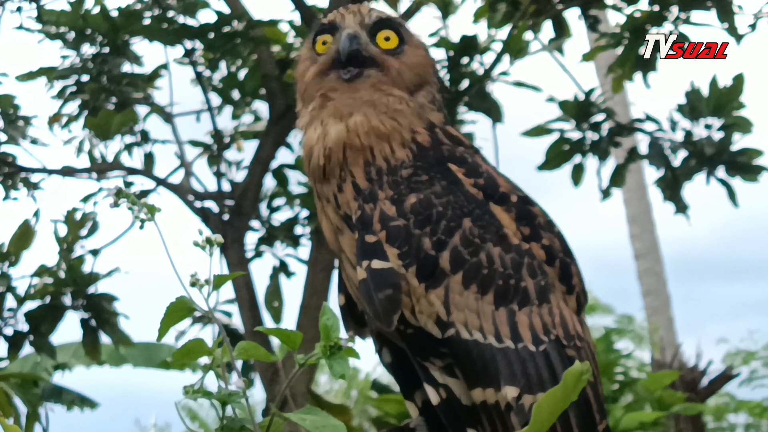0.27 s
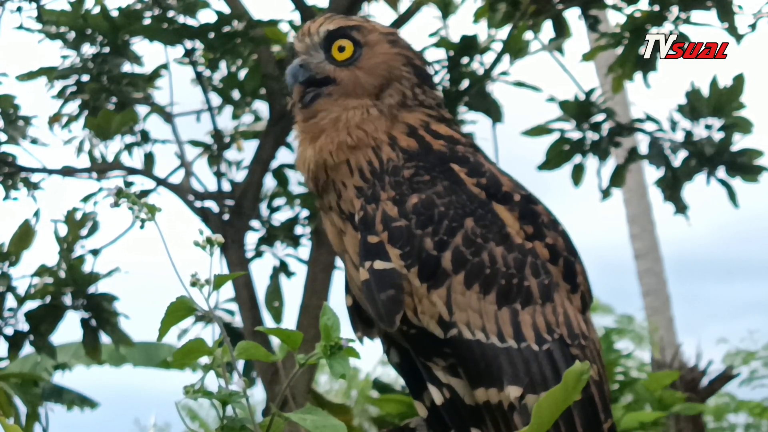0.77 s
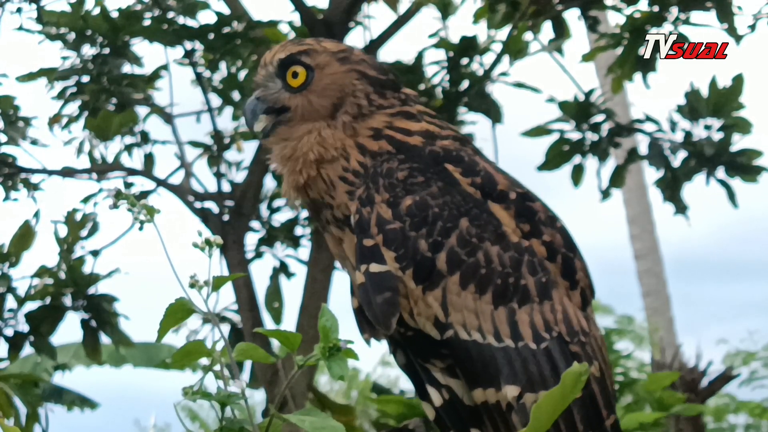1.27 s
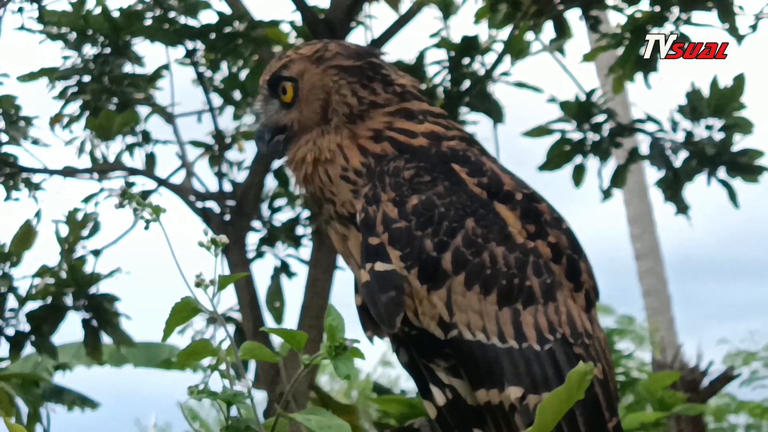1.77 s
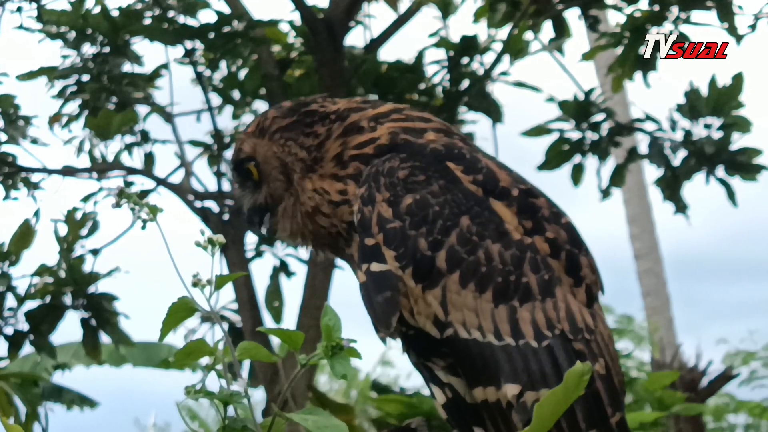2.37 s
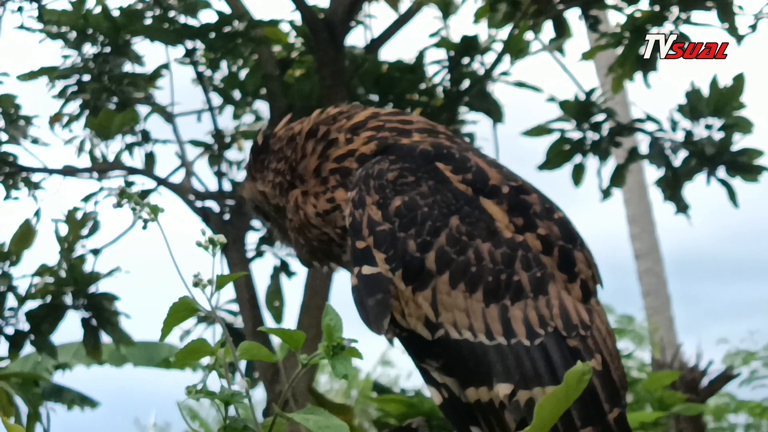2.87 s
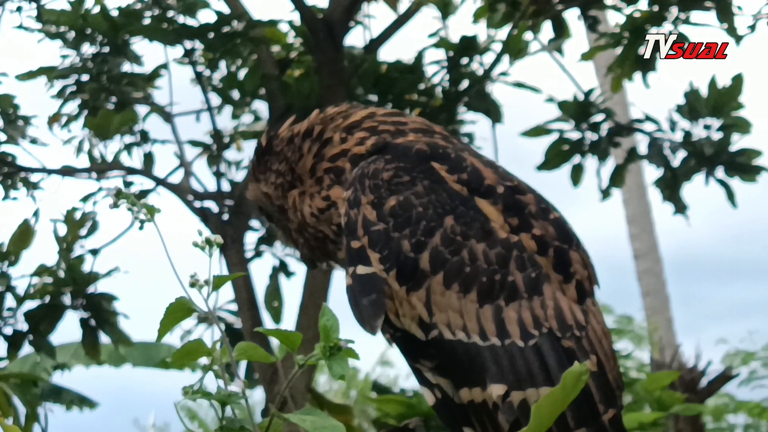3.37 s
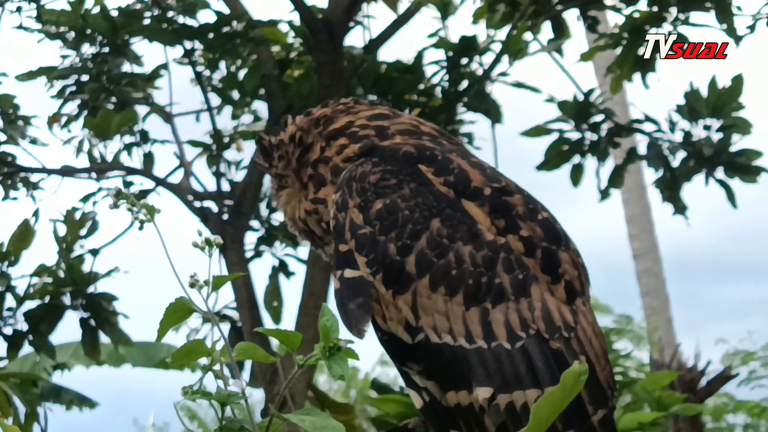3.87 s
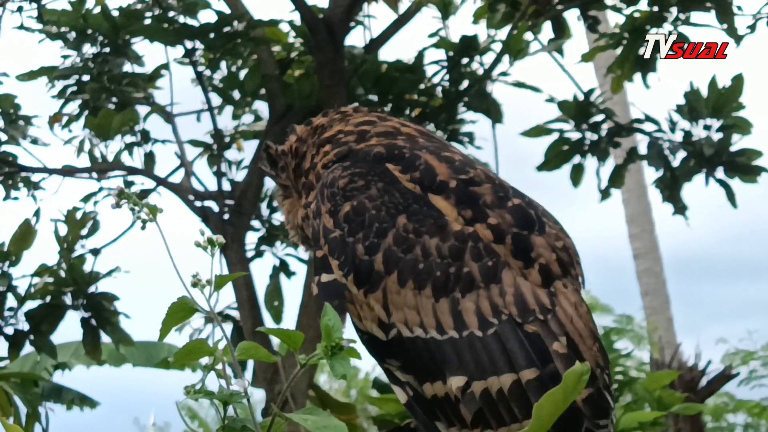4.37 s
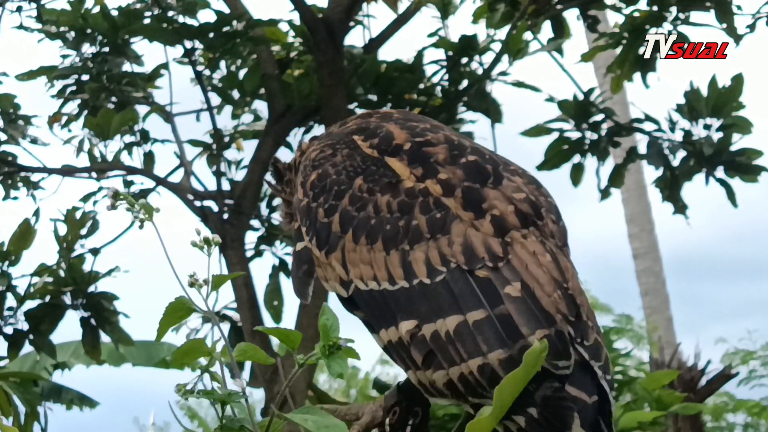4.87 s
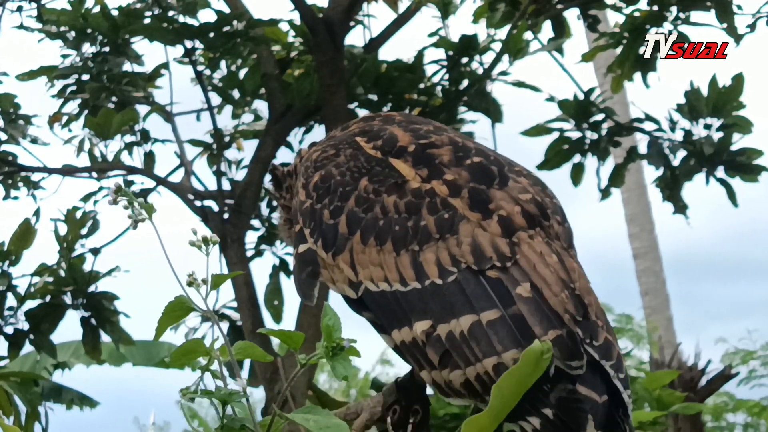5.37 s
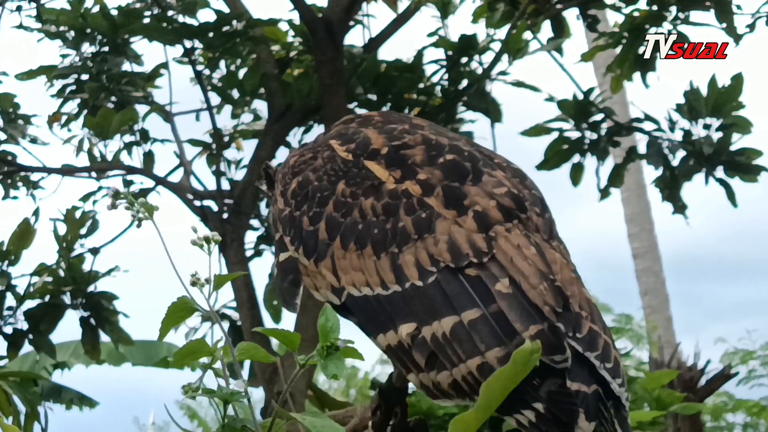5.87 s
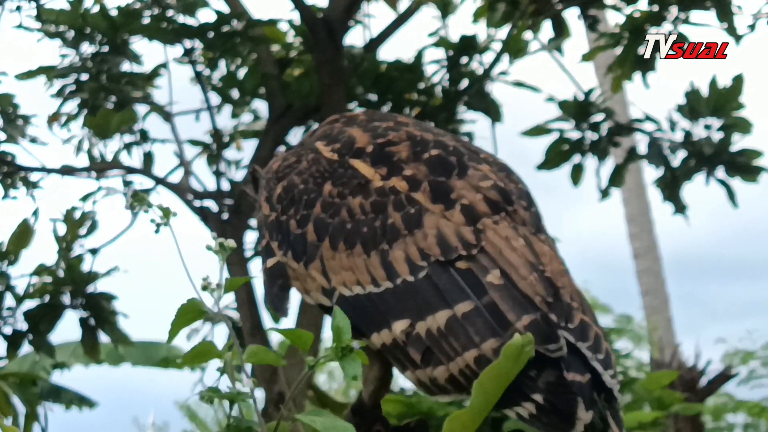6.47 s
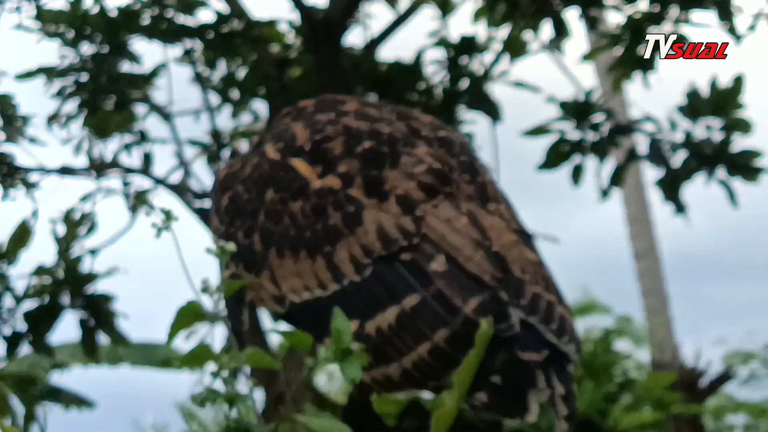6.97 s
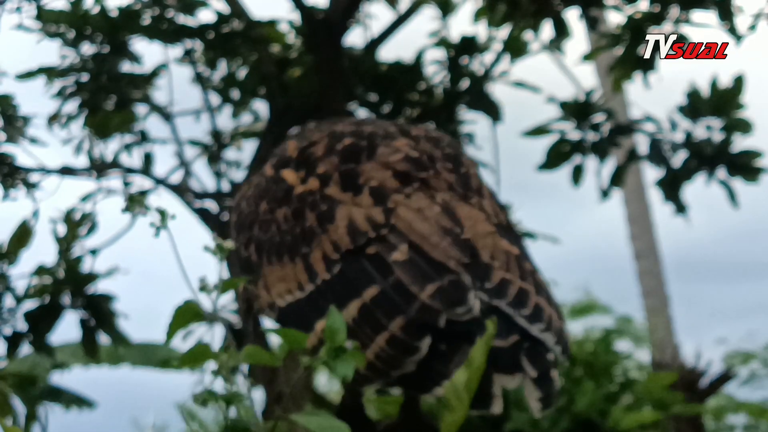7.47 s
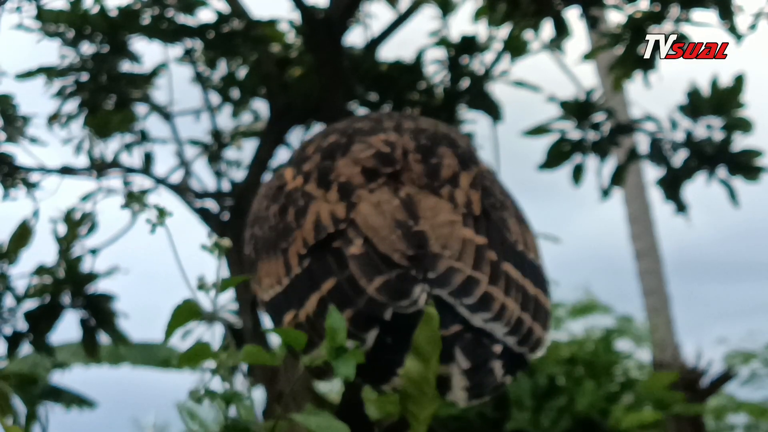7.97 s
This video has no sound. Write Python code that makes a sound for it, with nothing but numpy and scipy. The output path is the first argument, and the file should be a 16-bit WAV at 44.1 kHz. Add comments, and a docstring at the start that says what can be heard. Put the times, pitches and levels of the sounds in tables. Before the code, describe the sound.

Cicadas buzz steadily among tropical trees while an owl hoots in brief pairs, with faint birdsong and soft microphone bumps.

```python
"""Cicadas buzz near 6 kHz over a dry hiss among tropical trees; small birds chip, whistle and warble.
Then an owl, the main sound, gives two pairs of short, pure hoots that rise and fall in pitch.
The hiss drops away as each pair begins. Each cicada buzzes by clicking its tymbals (small drum skins)
very fast, which makes its body ring. Trunks and leaves scatter the bird calls into a soft echo.
A hand-held mono microphone adds rumble and soft bumps, and a few twigs tick."""
import sys
import numpy as np
from scipy import signal
from scipy.fft import rfft, irfft
from scipy.io import wavfile
from scipy.ndimage import uniform_filter1d

SR = 44100
rng = np.random.default_rng(int(sys.argv[2]) if len(sys.argv) > 2 else 0)


def output_pcm(signal):
    """Save a mono or channel-first signal as 16-bit PCM at the path in sys.argv[1].

    Samples are clipped to [-1, 1] before scaling.
    """
    pcm = np.clip(np.atleast_2d(signal).T, -1, 1) * 32767
    wavfile.write(sys.argv[1], SR, np.round(pcm).astype(np.int16))


N = 362061
TIME = np.arange(N) / SR

# the dull tone of a hand rubbing the microphone: frequency_hz, relative_db
RUB_SPECTRUM = [(20, -22), (50, -11), (90, 4.5), (150, 0), (240, -1), (400, -7.5), (800, -57)]


def from_db(db):
    """Turn decibels into a factor to multiply by."""
    return 10 ** (np.asarray(db) / 20)


def rms_one(x):
    """Scale a signal so that its average strength (rms) is 1."""
    return x / np.sqrt(np.mean(x ** 2) + 1e-20)


def ramp(elapsed_s, length_s):
    """Rise from 0 to 1 over the given length."""
    return np.clip(elapsed_s / length_s, 0, 1)


def gain_at_hz(spectrum, hz):
    """Read the gain at a frequency from rows of frequency_hz, level_db."""
    known_hz, db = np.transpose(spectrum)
    return from_db(np.interp(np.log(np.maximum(hz, 1)), np.log(known_hz), db))


def gain_curve(rows):
    """Gain over time from the last column (dB); silent outside the rows."""
    rows = np.array(rows)
    inside = (TIME >= rows[0, 0]) & (TIME <= rows[-1, 0])
    return from_db(np.interp(TIME, rows[:, 0], rows[:, -1])) * inside


def pitch_curve(rows, column=1):
    """Frequency over time from one column, usually the second."""
    rows = np.array(rows)
    return np.interp(TIME, rows[:, 0], rows[:, column])


def phase_of(hz):
    """The running angle of a wave whose pitch may change."""
    return 2 * np.pi * np.cumsum(hz) / SR


def noise(spectrum):
    """Noise with the given level per Hz."""
    hz = np.arange(N // 2 + 1) * SR / N
    return irfft(rfft(rng.standard_normal(N)) * gain_at_hz(spectrum, hz), N) * np.sqrt(SR / 2)


def drift(rate_hz):
    """Random wavering up to about the given rate, with a typical size of 1."""
    hz = np.arange(N // 2 + 1) * SR / N
    return rms_one(irfft(rfft(rng.standard_normal(N)) / (1 + (hz / rate_hz) ** 2), N))


def resonance(centre_hz, half_width_hz):
    """Noise ringing in a band whose centre may move."""
    low_pass = signal.butter(2, half_width_hz, fs=SR, output="sos")
    slow_noise = signal.sosfilt(low_pass, rng.standard_normal(N) + 1j * rng.standard_normal(N))
    return rms_one(np.real(slow_noise * np.exp(1j * phase_of(centre_hz * np.ones(N)))))


def add(track, start_s, sound):
    """Mix a short sound into a track."""
    at = max(int(start_s * SR), 0)
    track[at:at + len(sound)] += sound[:max(N - at, 0)]


def tree_echo(sound, first_echo_s=0.0065, fade_60_db_s=0.98):
    """Trunks and leaves scatter a sound into a thin tail that builds up and dies away."""
    t = np.arange(SR) / SR
    build_up = ramp(t - first_echo_s, first_echo_s)
    echoes = rng.standard_normal(SR) * from_db(-60 * t / fade_60_db_s) * build_up
    return signal.fftconvolve(sound, echoes / np.sqrt(np.sum(echoes ** 2)))[:N]


def open_air():
    """Air, far leaves and water blend into a faint, steady wash."""
    # the tone of the wash: frequency_hz, level_db (per Hz)
    spectrum = [(20, -95), (60, -78.5), (170, -88.5), (270, -71), (700, -68), (1600, -68.5), (2600, -69.5),
                (3300, -71), (4200, -77), (7500, -76.5), (10950, -76.5), (11250, -100), (12900, -99),
                (13500, -120)]
    return noise(spectrum)


def dry_hiss(grain_db=1.5, break_s=.06):
    """A slightly grainy hiss changes slowly in level and drops suddenly between stretches."""
    # the tone of the hiss: frequency_hz, relative_db
    spectrum = [(1700, -34), (2050, -6), (2400, -0.5), (2800, -7.5), (3200, -13.5), (3650, 3), (3950, -2.5),
                (4300, -6), (4900, -1), (7000, -2.5), (8700, -3.5), (9600, -6.5), (10950, -20),
                (11400, -23), (13000, -36), (13600, -71)]
    # where the stretches begin and end: time_s
    edges = [0, 2.81, 5.56, 7.3, 8.21]
    # one row for each stretch: first_db, last_db
    stretches = [(-28.6, -27.7), (-38, -30), (-37, -33.5), (-47, -51)]
    level_db = np.zeros(N)
    for start, end, (first_db, last_db) in zip(edges, edges[1:], stretches):
        level_db = np.where(TIME >= start, np.interp(TIME, [start, end], [first_db, last_db]), level_db)
    swells = from_db(uniform_filter1d(level_db, int(break_s * SR)))
    return rms_one(noise(spectrum) * from_db(grain_db * drift(400))) * swells


def grip_rumble(lumpy_db=2.6, boost_db=1.5, wander_db=2.5):
    """The hand holding the microphone makes a low, lumpy rumble."""
    # the strength of the rumble: time_s, relative_db
    levels = [(0.0, -44), (3.0, -57.5), (3.7, -50), (5.26, -54), (6.56, -49.5), (6.84, -53.5), (7.32, -47),
              (7.7, -56), (8.21, -50)]
    rub = rms_one(noise(RUB_SPECTRUM) * from_db(lumpy_db * drift(27)))
    return rub * gain_curve(levels) * from_db(boost_db + wander_db * drift(6))


def grip_bumps(lumpy_db=2.6, bass_cut_hz=105):
    """Each shift of the hand makes a soft bump with less bass than the rumble."""
    # shifts of the grip: middle_s, length_s, level_db
    shifts = [(.25, 0.39, -44.5), (1.213, 0.11, -40.5), (1.65, .05, -47), (3.105, .08, -30.5),
              (3.74, 0.19, -38.5), (4.18, .05, -44), (5.052, .12, -48), (5.736, .07, -38), (5.92, .08, -40),
              (6.224, 0.067, -29), (6.62, 0.29, -39.5), (6.967, 0.048, -37), (7.341, 0.53, -39)]
    bass_cut = signal.butter(2, bass_cut_hz, "high", fs=SR, output="sos")
    rub = signal.sosfilt(bass_cut, noise(RUB_SPECTRUM))
    swells = sum(from_db(db) * np.sin(np.pi * ramp(TIME - middle + length / 2, length))
                 for middle, length, db in shifts)
    return rms_one(rub * from_db(lumpy_db * drift(27))) * swells


def housing_knocks():
    """A knock on the microphone's housing is one dull, bell-shaped pulse."""
    # the knocks: time_s, peak_db, width_s
    knocks = [(3.382, -14, 0.00026), (7.085, -20, 0.00033)]
    return sum(from_db(db) * np.exp(-np.minimum(((TIME - time_s) / width) ** 2 / 2, 20))
               for time_s, db, width in knocks)


def twig_ticks(decay_s=.003):
    """Twigs and leaves give short, dry cracks of noise, each an octave wide."""
    # the cracks: start_s, centre_hz, level_db
    cracks = [(.35, 800, -19), (1.3673, 7000, -33), (1.8816, 7050, -22), (2.6564, 6960, -20),
              (3.1552, 6000, -20), (4.3595, 3080, -26), (4.541, 2420, -22.5), (6.3091, 7960, -24),
              (6.8472, 7020, -22)]
    out, t = np.zeros(N), np.arange(SR // 20) / SR
    for start, hz, db in cracks:
        band = signal.butter(4, [hz / np.sqrt(2), hz * np.sqrt(2)], "band", fs=SR, output="sos")
        burst = rms_one(signal.sosfilt(band, rng.standard_normal(len(t))))
        add(out, start, from_db(db) * np.exp(-t / decay_s) * burst)
    return out


def thin_buzz(fade_s=0.028, pulse_hz=88, depth=.8):
    """An insect gives faint, very high, pulsing bursts."""
    # the bursts: start_s, end_s, level_db
    bursts = [(5.201, 5.55, -74), (5.829, 6.561, -54), (6.828, 7.526, -54), (7.802, 8.3, -53)]
    # the bands it rings in: centre_hz, half_width_hz, relative_db
    bands = [(12130, 330, 0.45), (13400, 200, -2.5)]
    gain = sum(from_db(db) * ramp(np.minimum(TIME - start, end - TIME), fade_s)
               for start, end, db in bursts)
    pulses = 1 + depth * np.cos(2 * np.pi * pulse_hz * TIME)
    ringing = sum(from_db(db) * resonance(hz, half_width) for hz, half_width, db in bands)
    return gain * rms_one(pulses * ringing)


def throb(clicks_per_s, depth):
    """A gain that swells once for each tymbal click."""
    return rms_one(1 + depth * np.cos(phase_of(clicks_per_s * np.ones(N))))


def far_cicadas(half_width_hz=260, spread_hz=200, gain_db=-3.5):
    """Many far cicadas merge into one band of noise whose centre wanders."""
    # the course of the chorus: time_s, centre_hz, relative_db
    chorus = [(0.0, 6320, -33), (0.2, 6260, -27), (1.44, 6550, -26), (2.88, 6030, -31), (3.45, 6060, -33),
              (4.05, 6200, -26.5), (5.9, 6510, -28), (6.47, 6280, -29.5), (7.27, 6140, -34.5),
              (8.21, 6250, -35)]
    centre = pitch_curve(chorus)
    swarm = resonance(centre - spread_hz, half_width_hz) + resonance(centre + spread_hz, half_width_hz)
    return rms_one(swarm) * throb(clicks_per_s=244, depth=.3) * gain_curve(chorus) * from_db(gain_db)


def tymbal_buzz(rate, gain, body, jitter=0.001182, flutter_db=1.5):
    """Regular clicks make tones at multiples of their rate; those near the body's ring sound loudest."""
    phase = phase_of(rate * (1 + jitter * drift(39.63)))
    lowest, highest = int(body[0][0] / rate.max()) + 1, int(body[-1][0] / rate.min())
    tones = sum(gain_at_hz(body, k * rate) * np.sin(k * phase + 2 * np.pi * rng.random())
                for k in range(lowest, highest + 1))
    return np.sqrt(2) * tones * gain * from_db(flutter_db * drift(6))


def hoarse_cicada(tones_db=-4.5):
    """Each click is a noisy burst in the body's ringing bands, which rise as the belly tightens."""
    # two spells of song, each with rows of: time_s, clicks_per_s, ring_hz, level_db
    spells = [
        [(1.8, 290, 6060, -53), (2.4, 274, 6000, -31), (2.8, 275, 6000, -28.5), (3.45, 264, 6030, -30.5),
         (3.9, 243, 6360, -33.5), (4.4, 262, 6580, -36.5), (5.0, 258, 6480, -36.5)],
        [(5.6, 230, 6280, -36.5), (6.2, 205, 6120, -38.5), (6.5, 260, 6085, -33.5), (7.3, 290, 6094, -30),
         (7.75, 300, 6060, -31), (8.21, 220, 6000, -35)],
    ]
    # the body's ringing bands: ratio_to_ring_hz, half_width_hz, relative_db
    bands = [(1, 115, 0), (1.04, 90, -7), (.925, 130, -7), (.848, 115, -6.5), (.79, 130, -11)]
    # the strength of the tones from its more regular clicks: frequency_hz, relative_db
    tone_spectrum = [(4950, -14), (5100, -6), (5350, -14), (5600, -8), (5750, -8), (5900, 0), (6080, 0),
                     (6300, -4), (6450, -20)]
    song = np.concatenate(spells)
    rate, ring_hz, gain = pitch_curve(song), pitch_curve(song, column=2), gain_curve(song)
    body = sum(from_db(db) * resonance(ratio * ring_hz, half_width) for ratio, half_width, db in bands)
    rasp = rms_one(body) * throb(rate, depth=0.54) * gain
    return rasp + from_db(tones_db) * tymbal_buzz(rate, gain, tone_spectrum, jitter=0.00405)


def warm_up(song, fade_s=0.47):
    """Click rate and gain rise with a cicada's effort; each spell of song fades at its end."""
    rate, gain = np.full(N, float(song[0][3])), np.zeros(N)
    for start, end, warm_up_s, first_rate, settled_rate in song:
        effort = 1 - np.exp(-np.maximum(TIME - start, 0) / warm_up_s)
        rate = np.where(TIME >= start, first_rate + (settled_rate - first_rate) * effort, rate)
        gain += effort * ramp(end - TIME, fade_s)
    return rate, gain


def near_cicadas():
    """Three near cicadas buzz clearly, each with its own click rate and ringing body."""
    # spells of song: start_s, end_s, warm_up_s, first_clicks_per_s, settled_clicks_per_s
    slow_song = [(-6, .72, 1.42, 226, 248), (3.5, 9, 1.42, 226, 248)]
    fast_song = [(-.05, 2.9, .45, 260.5, 266.8)]
    medium_song = [(-.05, 2.6, .28, 250, 261.8)]
    # how strongly each body rings: frequency_hz, relative_db
    slow_body = [(5700, -22), (6150, -7), (6400, 0), (6570, 3), (6660, -10), (6830, -5), (6910, -2),
                 (7150, -4), (7280, -20)]
    fast_body = [(5600, -30), (6130, -6.5), (6400, -11), (6665, 2), (6930, -13), (7300, -2)]
    medium_body = [(5600, -6), (6000, -7.5), (6250, 3), (6540, -10), (6800, -8), (7070, -16), (7300, -30)]
    singers = [(slow_song, slow_body, -36), (fast_song, fast_body, -36), (medium_song, medium_body, -37)]
    return sum(from_db(db) * tymbal_buzz(*warm_up(song), body) for song, body, db in singers)


def glide(length_s, from_hz, to_hz):
    """A sliding whistled note with soft ends."""
    progress = np.linspace(0, 1, int(length_s * SR))
    envelope = np.sqrt(4 * progress * (1 - progress))
    return np.sqrt(2) * envelope * np.sin(phase_of(from_hz + (to_hz - from_hz) * progress))


def whistling_bird(trees_db=-15):
    """A far bird repeats a slightly sinking whistle."""
    # the whistles: start_s, level_db
    whistles = [(5.598, -36.5), (6.585, -36.5), (7.572, -37.5)]
    voice = np.zeros(N)
    for start, db in whistles:
        add(voice, start, from_db(db) * glide(length_s=.2, from_hz=2980, to_hz=2912))
    return voice + from_db(trees_db) * tree_echo(voice)


def warbling_bird(start_s=6.157, every_s=.1605, repeats=8, trees_db=-3):
    """A bird deep in the trees gives stray notes and a repeated zigzag that swells and fades."""
    # one zigzag, a short rise and then an arch: time_s (from its start), pitch_hz, relative_db
    shape = [(0, 2150, -7), (.018, 2370, 0), (.042, 2620, -8), (.066, 2450, -28), (.092, 2250, -9),
             (.116, 2620, -1), (.134, 2820, -2), (.151, 2400, -2), (.1605, 2150, -7)]
    # single notes: start_s, length_s, from_hz, to_hz, level_db
    stray_notes = [(.77, .05, 2400, 2740, -34.5), (.988, .034, 2650, 2310, -33.5),
                   (1.079, .035, 2300, 2530, -35), (1.581, .083, 2410, 2620, -38),
                   (8.0, .04, 2800, 2450, -38)]
    peak_s, peak_db, fade_db_per_s = 6.42, -34, 9
    zigzag = np.sqrt(2) * gain_curve(shape) * np.sin(phase_of(pitch_curve(shape)))
    voice = np.zeros(N)
    for k in range(repeats):
        add(voice, start_s + k * every_s, zigzag)
    voice *= from_db(peak_db - fade_db_per_s * np.abs(TIME - peak_s))
    for start, length, from_hz, to_hz, db in stray_notes:
        add(voice, start, from_db(db) * glide(length, from_hz, to_hz))
    return voice + from_db(trees_db) * tree_echo(voice)


def chipping_bird(top_hz=7770, droop_hz=900, length_s=0.017, echo_s=0.016, echo_db=-12, trees_db=-11):
    """A small bird gives pairs of tiny, high, arched chips, each with one near echo."""
    # the chips: middle_s, level_db
    chips = [(1.3824, -16.5), (1.528, -18), (4.027, -22.5), (4.1678, -22.5), (7.0979, -21.5), (7.2533, -29)]
    from_middle = np.linspace(-1, 1, int(length_s * SR))
    envelope = np.cos(from_middle * np.pi / 2) ** 2
    chip = np.sqrt(2) * envelope * np.sin(phase_of(top_hz - droop_hz * from_middle ** 2))
    out = np.zeros(N)
    for middle, db in chips:
        start = middle - length_s / 2
        add(out, start, from_db(db) * chip)
        add(out, start + echo_s, from_db(db + echo_db) * chip)
    return out + from_db(trees_db) * tree_echo(out)


def owl(waver=.0005, attack_s=.02, release_s=.052, trunk_echo_s=.055, trunk_db=-18.5, trees_db=-14.5):
    """Each hoot is one pure tone on an arch of pitch; near echoes hollow it out around the top."""
    # the hoots: start_s, length_s, top_pitch_hz, level_db
    hoots = [(2.8082, .1345, 1503, -18.9), (3.4978, .183, 1524, -19.6), (5.562, .1359, 1499, -19.3),
             (6.2521, .186, 1527, -19.2)]
    # near echoes that partly cancel the hoot as it passes 1500 Hz: delay_s, relative_db
    near_echoes = [(.008257, -3.1), (.017724, -10.7)]
    rise_hz, fall_hz, roundness = 136, 97, 1.7
    top_at = .587  # share of the hoot's length
    unsteady = 1 + waver * drift(87)
    voice = np.zeros(N)
    for start, length, top_hz, db in hoots:
        past_top = ramp(TIME - start, length) - top_at
        rising = rise_hz * np.abs(past_top / top_at) ** roundness
        falling = fall_hz * np.abs(past_top / (1 - top_at)) ** roundness
        pitch_hz = (top_hz - np.where(past_top < 0, rising, falling)) * unsteady
        fade_in = np.sin(np.pi / 2 * ramp(TIME - start, attack_s))
        fade_out = np.sin(np.pi / 2 * ramp(start + length - TIME, release_s))
        voice += from_db(db) * fade_in * fade_out * np.sqrt(2) * np.sin(phase_of(pitch_hz))
    paths = near_echoes + [(trunk_echo_s, trunk_db)]
    echoes = sum(from_db(db) * np.interp(TIME - delay, TIME, voice, left=0) for delay, db in paths)
    return voice + echoes + from_db(trees_db) * tree_echo(voice)


def scene():
    """Insects, air, birds and hand noise, the same in both channels."""
    insects = near_cicadas() + hoarse_cicada() + far_cicadas() + thin_buzz()
    background = dry_hiss() + open_air()
    birds = owl() + chipping_bird() + warbling_bird() + whistling_bird()
    handling = grip_rumble() + grip_bumps() + housing_knocks()
    mono = background + handling + twig_ticks() + insects + birds
    return np.stack([mono, mono])


def record(dry, cutoff_hz=14350):
    """A steep filter cuts away the highest treble."""
    return signal.sosfilt(signal.ellip(10, .1, 80, cutoff_hz, fs=SR, output="sos"), dry)


dry = scene()
out = record(dry)
output_pcm(out)
```